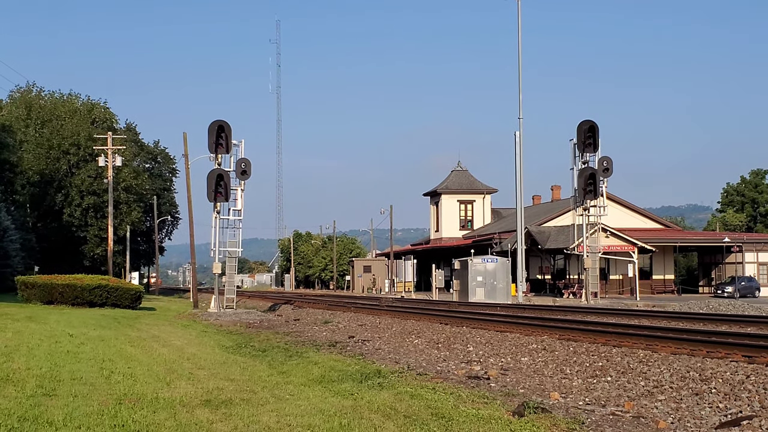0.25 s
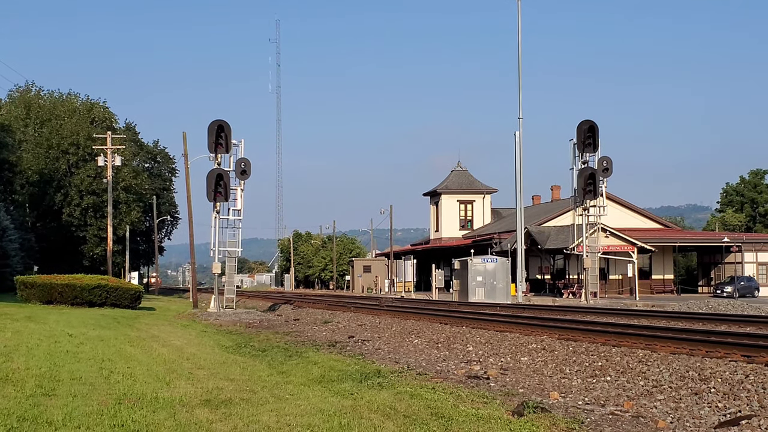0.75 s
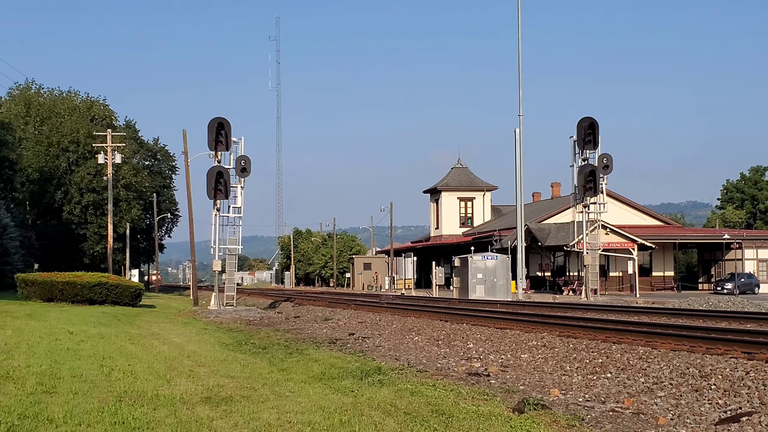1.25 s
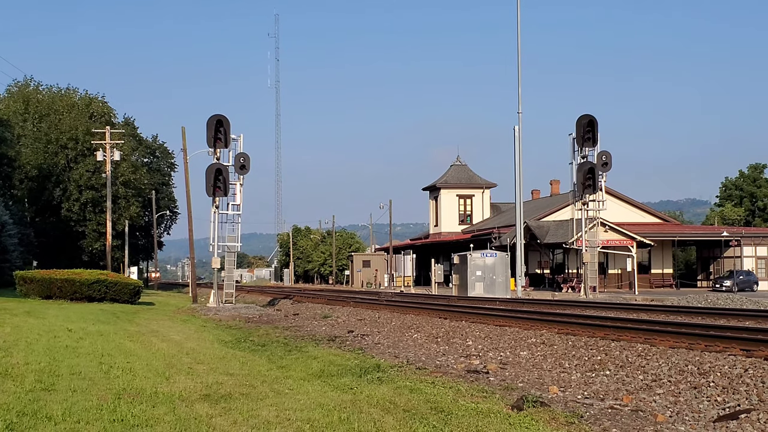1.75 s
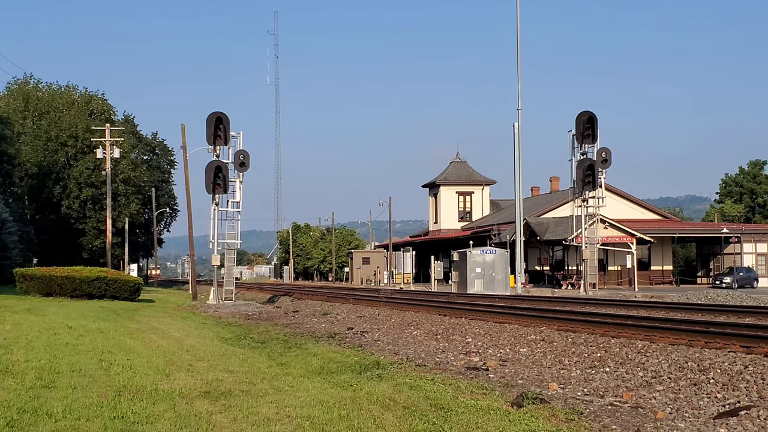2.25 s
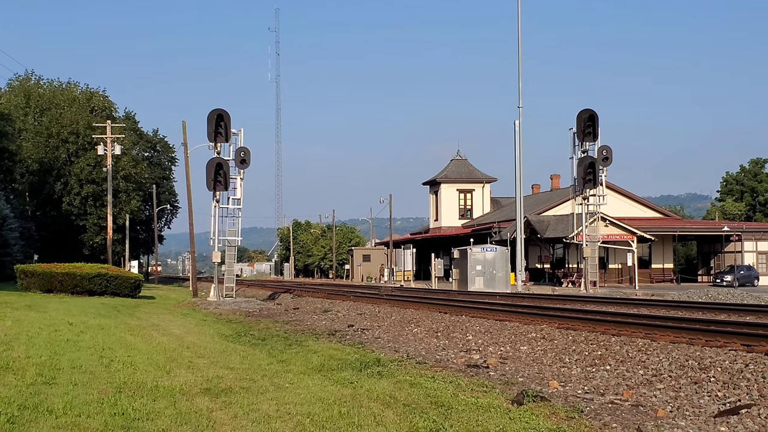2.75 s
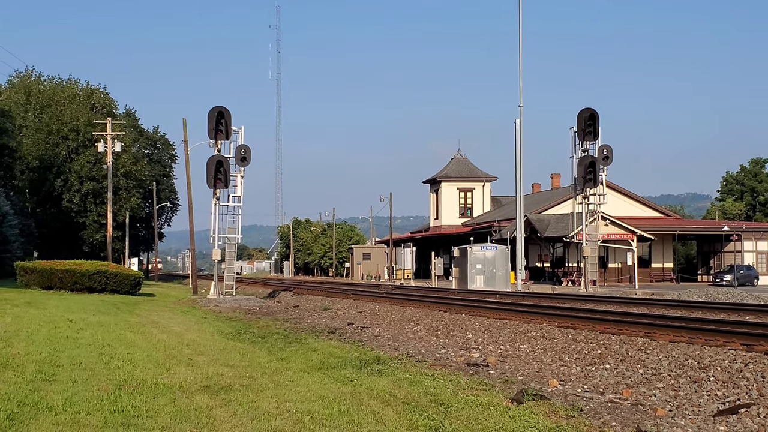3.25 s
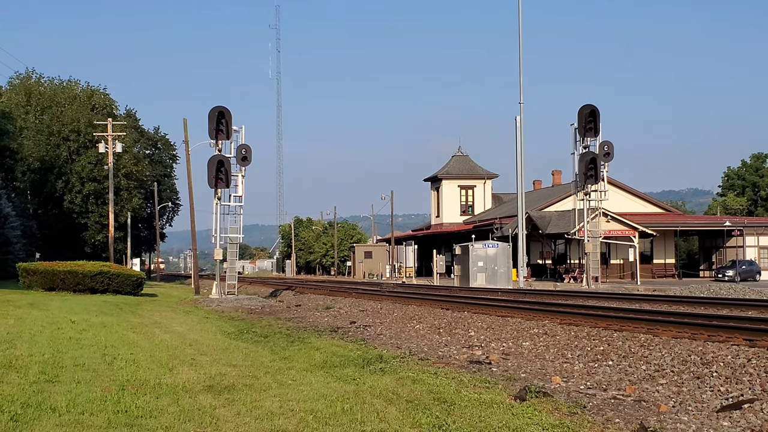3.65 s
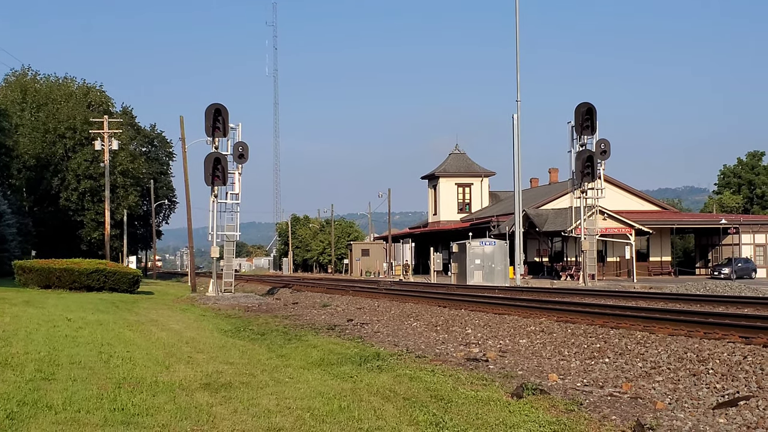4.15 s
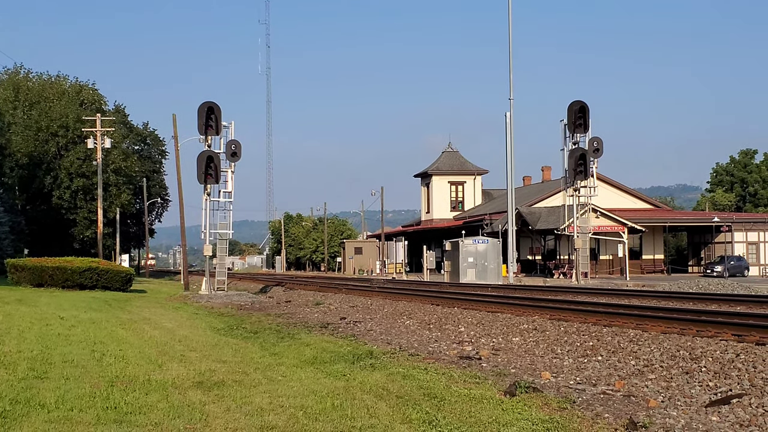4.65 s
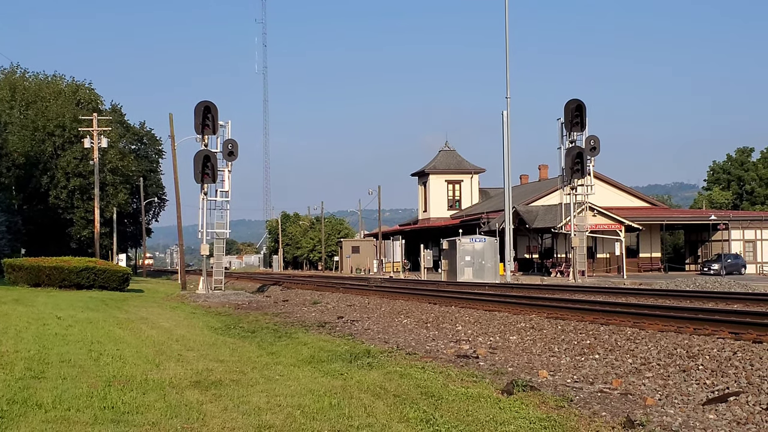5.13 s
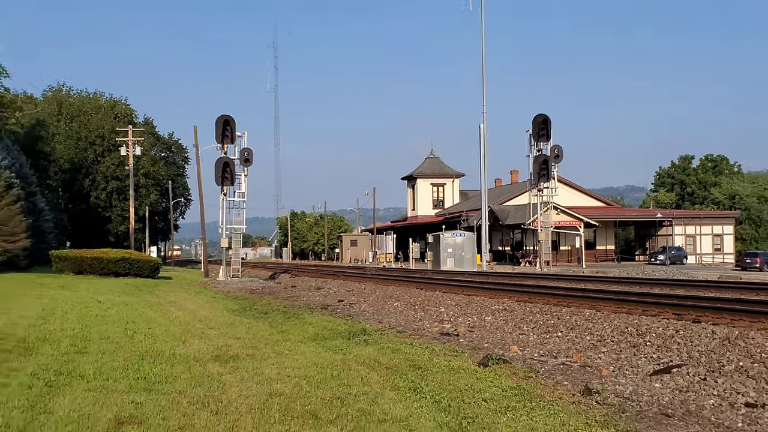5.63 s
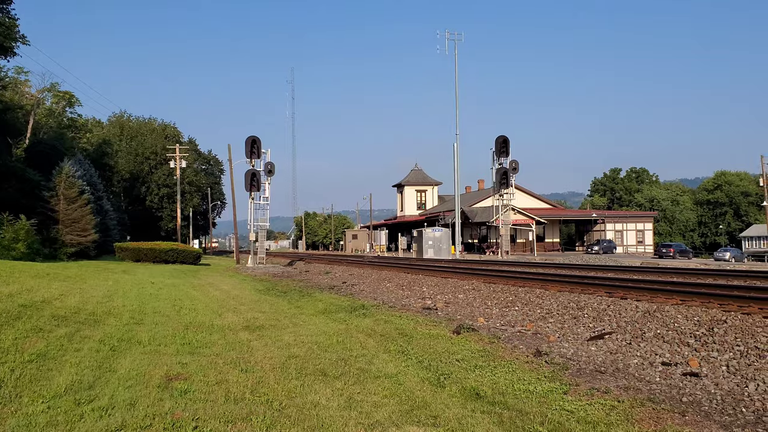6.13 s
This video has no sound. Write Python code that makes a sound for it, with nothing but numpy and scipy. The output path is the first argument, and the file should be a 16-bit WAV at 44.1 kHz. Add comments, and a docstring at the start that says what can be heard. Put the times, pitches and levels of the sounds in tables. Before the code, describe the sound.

A fast, high cricket trill swells over fainter crickets beside a quiet railway yard, with nasal catbird mews, small chirps and low distant engine rumble.

```python
"""Beside a railway yard on a summer morning: a fast near cricket trill over slower and fainter crickets.
A catbird mews twice as harmonic stacks roughened by noise; chirps and caws are gliding tones.
Shaped noise makes town rumble, traffic, insect chorus and hiss; narrow whines come and go.
A distant diesel, summed firing orders, gathers speed, then eases. Decaying modes tick in the camera body."""
import sys
import numpy as np
from scipy import signal
from scipy.fft import rfft, irfft, next_fast_len
from scipy.io import wavfile
from scipy.ndimage import uniform_filter1d, map_coordinates

SR = 44100
rng = np.random.default_rng(int(sys.argv[2]) if len(sys.argv) > 2 else 0)


def store_pcm(level_fs):
    """Save levels as 16-bit WAV."""
    pcm = np.round(np.clip(level_fs, -1, 1) * 32767).astype(np.int16)
    wavfile.write(sys.argv[1], SR, np.atleast_2d(pcm).T)


N = 281522


def amp(db):
    """Amplitude ratio from dB."""
    return 10 ** (np.asarray(db) / 20)


def unit(x):
    """Scale to rms 1."""
    return x / np.sqrt(np.mean(x ** 2) + 1e-20)


def along(points, hz):
    """Interpolate (f/Hz, value) points on a log frequency axis."""
    f, v = np.transpose(points)
    return np.interp(np.log(hz + 1), np.log(f + 1), v)


def curves(rows):
    """One value per sample for each column after the time."""
    s, *cols = np.transpose(rows)
    return [np.interp(np.arange(N) / SR, s, c) for c in cols]


def ramp(from_s, to_s):
    """0 before, 1 after, a straight line between."""
    return np.interp(np.arange(N) / SR, [from_s, to_s], [0, 1])


def wobble(knots_per_s):
    """Smooth random curve through normal random knots."""
    knots = rng.standard_normal(int(N * knots_per_s / SR) + 4)
    return map_coordinates(knots, [np.arange(N) * knots_per_s / SR])


def filtered(x, response):
    """Apply a response given as a function of frequency."""
    m = next_fast_len(N + SR // 2)
    return irfft(rfft(x, m) * response(np.fft.rfftfreq(m, 1 / SR)), m)[..., :N]


def sides(pan_db):
    """Left and right gains; pan_db is left over right."""
    return amp(np.array([pan_db / 2, -pan_db / 2]))


def add(out, s, sound):
    """Mix a stereo sound in at time s."""
    part = out[:, max(round(s * SR), 0):][:, :sound.shape[1]]
    part += sound[:, :part.shape[1]]


def rush(spectrum, patchy_db):
    """Stereo noise of rms 1: shaped spectrum, random gain patches, left-right likeness set by frequency."""
    # left-right correlation: f/Hz, correlation
    alike = [(60, 1), (150, 0.95), (380, 0.76), (950, 0.11), (2380, -0.1), (5980, -0.091), (15000, -0.33)]
    z = signal.stft(rng.standard_normal((2, N)), nperseg=512)[2]
    field = uniform_filter1d(rng.standard_normal(z.shape[1:]), 6, 0)
    field = uniform_filter1d(field, 14, 1)
    pair = signal.istft(z * amp(patchy_db * unit(field)), nperseg=512)[1][:, :N]
    closed = [(spectrum[0][0] * .8, -120), *spectrum, (spectrum[-1][0] * 1.1, -120)]

    def mid_side_response(hz):
        turn = np.arccos(np.clip(along(alike, hz), -1, .99)) / 2
        return amp(along(closed, hz)) * [np.cos(turn), np.sin(turn)]

    mid, side = filtered(pair, mid_side_response)
    return unit(np.array([mid + side, mid - side]))


def grass(x, wet_db, t60):
    """Short decaying scatter off stems and ballast, different at each port."""
    t = np.arange(SR // 8) / SR
    tail = rng.standard_normal((2, len(t))) * amp(-60 * t / t60)
    tail = tail / np.linalg.norm(tail[0])
    return x + amp(wet_db) * signal.fftconvolve(x, tail, axes=1)[:, :N]


def buildings(x):
    """Discrete wall echoes, channels swapped on every other one."""
    # delay/s, level/dB
    wall_echoes = [(.033, -5), (.062, -5), (.095, -7.5), (.128, -9.5), (.165, -14), (.205, -13), (.26, -19)]
    out = 0
    for k, (delay_s, db) in enumerate(wall_echoes):
        delayed = np.pad(x[::(-1) ** k], ((0, 0), (round(delay_s * SR), 0)))[:, :N]
        out = out + amp(db) * delayed
    return out


def yard(x, wet_db):
    """Wall echoes, smeared by trees."""
    return grass(x + amp(wet_db) * buildings(x), wet_db=-5, t60=.12)


def stroke(length, top_hz, sag_hz, lead_rad, octave_db, fall_hz=0):
    """One wing stroke: the file speeds up and slows, so the pitch arches; left leads right by lead_rad."""
    u = np.linspace(-1, 1, round(length * SR))
    hz = top_hz - sag_hz * u ** 2 - fall_hz * u
    phase = 2 * np.pi * np.cumsum(hz) / SR + rng.uniform(0, 2 * np.pi)
    phase = phase + [[lead_rad / 2], [-lead_rad / 2]]
    shape = (1 - u ** 8) * amp(-3 * u ** 2)
    return shape * amp(rng.normal(0, 1.0)) * (np.sin(phase) + amp(octave_db) * np.sin(2 * phase))


def glide(length, first_hz, middle_hz, last_hz, rasp):
    """A tone bending smoothly through three pitches; rasp shakes its size."""
    u = np.linspace(-1, 1, round(length * SR))
    hz = middle_hz + (last_hz - first_hz) / 2 * u + ((first_hz + last_hz) / 2 - middle_hz) * u ** 2
    shake = 1 + rasp * unit(uniform_filter1d(rng.standard_normal(len(u)), 160))
    fade = amp(-9 * np.clip(u, 0, 1) ** 2)  # breath runs out
    return (1 - u ** 4) * fade * shake * np.sin(2 * np.pi * np.cumsum(hz) / SR)


def town():
    """Rumble, drone and traffic wash: three bands of shaped noise with moving levels."""
    # t/s, level/dB
    rumble_level = [(0.0, -43.5), (0.5, -47), (0.8, -40), (0.85, -44.5), (1.87, -47), (1.92, -39),
                    (1.99, -49), (2.49, -45.5), (2.54, -57), (2.65, -44), (3.7, -47.5), (3.96, -45),
                    (5.85, -42.5), (5.95, -52.5), (6.18, -44), (6.38, -50.5)]
    # t/s, drone level/dB, traffic level/dB
    town_levels = [(0, -66.5, -60.5), (1.1, -61, -59.5), (1.6, -62.5, -59), (2.36, -63, -59),
                   (2.81, -64, -59.5), (3.94, -63, -59.5), (4.48, -64, -59.5), (5.35, -65, -57.5),
                   (5.8, -70.5, -61.5), (6.38, -73, -62.5)]
    # spectra: f/Hz, relative density/dB
    rumble_spectrum = [(12, -41), (20, -9.5), (48, -3), (64, 1.5), (83, -5), (97, -11.5), (130, -18.5),
                       (170, -53), (290, -120)]
    traffic_spectrum = [(110, -36), (190, -12), (232, -6), (327, -4), (493, -11), (724, -1.5), (848, -5.5),
                        (981, -11), (1850, -11), (2480, -17), (2680, -15.5), (3190, -22), (3320, -22.5),
                        (3590, -22), (4500, -19), (5850, -25), (9900, -120)]
    drone_spectrum = [(100, -12), (135, -5.0), (175, -13.5), (210, -16.5)]
    drone_db, traffic_db = curves(town_levels)
    rumble = amp(curves(rumble_level)[0]) * rush(rumble_spectrum, patchy_db=1.0)
    drone = amp(drone_db + 2.4 * wobble(4.2)) * rush(drone_spectrum, patchy_db=-2.0)
    traffic = amp(traffic_db) * rush(traffic_spectrum, patchy_db=1.1)
    return rumble + drone + traffic * sides(0.4)[:, None]


def air():
    """Noise bands: far insect chorus, one very high singer, fine hiss, a treble that swells at times."""
    # spectra: f/Hz, relative density/dB
    chorus_spectrum = [(4300, -44), (4800, 6), (5250, 5), (5800, -5.5), (6200, -1.5), (6900, 5.5),
                       (7700, 0), (8300, -6), (8800, -43)]
    hiss_spectrum = [(10000, -12.5), (11300, 2), (13000, 1), (14700, 8), (15600, 0.5)]
    # t/s, level/dB
    singer_level = [(0, -89), (.4, -78), (.9, -81), (1.24, -100), (3, -94), (4, -77), (6.38, -87)]
    treble_level = [(0, -87), (.6, -80.5), (1.3, -89), (3, -96), (5.7, -105), (6.13, -79), (6.38, -88)]
    chorus = amp(-68.0 + wobble(0.85)) * rush(chorus_spectrum, patchy_db=1.5)
    high = amp(curves(singer_level)[0]) * rush([(12400, -25), (12900, 7), (13400, -10)], patchy_db=7.0)
    swell = amp(curves(treble_level)[0]) * rush([(9400, -7.5), (10500, 0.0), (11700, -7)], patchy_db=6.5)
    hiss = amp(-79.5 + 0.71 * wobble(3.0)) * rush(hiss_spectrum, patchy_db=4.0)
    return chorus * sides(3.2)[:, None] + (high + swell + hiss) * sides(1.9)[:, None]


def engine():
    """Low orders of the diesel's firing cycle plus the 15th, each wandering in level and phase."""
    # t/s, firing cycle rate/Hz, 10th order level/dB, 15th order level/dB
    engine_run = [(0, 7.9, -58, -80), (1, 10.9, -70.5, -78), (1.8, 10.9, -66, -72), (2.6, 11.2, -57, -61),
                  (3.5, 11.8, -54, -68), (4.1, 12.15, -56, -78), (5.05, 11.9, -55, -85),
                  (5.2, 10, -70, -89), (6.38, 10.5, -66, -89)]
    # order, level above the 10th/dB
    low_orders = [(6, -1), (7, -1), (8, 0), (9, 0), (10, 0), (11, -15), (12, -17)]
    cycle_hz, tenth_db, top_db = curves(engine_run)
    turn = 2 * np.pi * np.cumsum(cycle_hz) / SR
    low = 0
    for k, db in low_orders:
        low = low + amp(tenth_db + db + 2 * wobble(2.5)) * np.sin(k * turn + .5 * wobble(3))
    top = amp(top_db + wobble(2)) * np.sin(15 * turn + .4 * wobble(3))
    return np.sqrt(2) * (low + top)  # levels are rms


def whines():
    """Narrow noise mixed with phase-jittered tones: low and high whines peak, high and thin ones waver."""
    # low, high, thin: f/Hz, width/Hz, left-right/dB
    whine_tones = [(1114, 68, -6.5), (2642, 24, -7.5), (3390, 45, -4)]
    # power share of the jittered tone, the rest narrow noise: low, high, thin
    tone_shares = (.1, .8, .3)
    # base levels: t/s, level/dB
    low_base = [(0, -89), (1.8, -89), (2.4, -73), (5.7, -75.5), (6.38, -72.5)]
    high_base = [(0, -92), (.3, -76), (.8, -95), (1, -97), (1.2, -78.5), (2.35, -81), (2.5, -95),
                 (2.8, -80.5), (3.3, -80), (3.45, -91), (3.6, -77.5), (4.7, -83), (4.85, -84), (5.1, -90),
                 (5.4, -82), (5.6, -80), (6, -93), (6.1, -80), (6.3, -80), (6.34, -88)]
    thin_base = [(0, -90), (1.1, -83), (2.4, -83), (2.6, -97), (6.38, -99)]
    # peaks: t/s, level/dB
    low_peaks = [(2.72, -63.5), (3.94, -60), (4.25, -62.5), (4.54, -66), (5.1, -68), (5.6, -62),
                 (6.08, -68.5)]
    high_peaks = [(.44, -73), (1.18, -73), (1.72, -74.5), (2, -75.5), (2.16, -87), (4.54, -71),
                  (5.2, -74.5), (5.31, -71.5), (6.19, -70), (6.27, -73)]
    swell_db_per_s, waver_db = 68, 3.5
    out, t = 0, np.arange(N) / SR

    def with_peaks(base_db, swells):
        slopes = [db - swell_db_per_s * abs(t - s) for s, db in swells]
        return np.max([base_db] + slopes, axis=0)

    low_db = with_peaks(curves(low_base)[0], low_peaks)
    high_db = with_peaks(curves(high_base)[0] + waver_db * wobble(14), high_peaks)
    thin_db = curves(thin_base)[0] + waver_db * wobble(9.5)
    for db, (hz, width_hz, pan_db), share in zip((low_db, high_db, thin_db), whine_tones, tone_shares):
        resonance = lambda f: 1 / (1 + ((f - hz) / (width_hz / 2)) ** 2)
        fuzz = unit(filtered(rng.standard_normal(N), resonance))
        tone = unit(np.sin(2 * np.pi * hz * t + wobble(width_hz)))
        whine = np.sqrt(share) * tone + np.sqrt(1 - share) * fuzz
        out = out + amp(db + 0.57 * wobble(7.9)) * whine * sides(pan_db)[:, None]
    return out


def ticks():
    """Modes of the camera's plastic shell ring briefly; the far (right) port hears them late and dull."""
    # t/s, level/dB, treble/dB, left-right/dB
    tick_events = [(1.104, -45, 16, 6), (2.6412, -13.5, -13.5, 31), (2.835, -53, 25.5, 16),
                   (4.875, -42, -20, 12), (5.321, -33, -22, 17), (6.077, -35.5, -18, 21)]
    # shell modes: f/Hz, level/dB, t60/s
    shell_modes = [(1020, -13.5, 0.0088), (2070, 3, 0.0042), (2593, -3.5, 0.0069), (6520, -1, 0.0023),
                   (9350, -17, 0.003)]
    out, t = np.zeros((2, N)), np.arange(SR // 40) / SR
    soft = np.exp(-(t / .0003) ** 2) - 1  # the contact takes a moment
    for s, db, treble_db, pan_db in tick_events:
        ring = []
        for hz, level_db, t60 in shell_modes:
            decay = amp(level_db - 60 * t / t60 + treble_db * (hz > 5000))
            ring.append(soft * decay * np.sin(2 * np.pi * hz * t))
        late = np.pad(sum(ring[:2]), (30, 0))[:len(t)]  # two lowest modes, 30 samples late
        add(out, s, amp(db) * np.array([sum(ring), amp(-pan_db) * late]))
    return out


def far_crickets():
    """Two trills of strokes falling in pitch, half drowned in scatter."""
    # stroke rate/Hz, first stroke/s
    far_beats = [(28.02, .032), (14.02, .004)]
    # middle f/Hz, fall in half a stroke/Hz, level/dB
    far_songs = [(5300, 277, -70.5), (6050, 250, -71)]
    out = 0
    for (rate_hz, first_s), (hz, fall_hz, db) in zip(far_beats, far_songs):
        song = np.zeros((2, N))
        for centre_s in np.arange(first_s, N / SR, 1 / rate_hz):
            sound = stroke(.018, rng.normal(hz, 60), 150, -1.5, octave_db=-40, fall_hz=fall_hz)
            add(song, centre_s - .009 + rng.normal(0, .0008), sound)
        out = out + amp(db + 2 * wobble(2)) * song
    return grass(out * sides(2)[:, None], wet_db=-2, t60=.11)


def slow_cricket():
    """Bouts of separate wing strokes, higher than the near cricket and to the left."""
    # first stroke/s, last stroke/s, strokes, first level/dB, last level/dB
    bouts = [(0.125, 0.425, 7, -79, -70), (1, 1.222, 5, -79, -64), (2.013, 2.463, 9, -75, -74),
             (2.964, 3.395, 9, -67, -61.5), (3.816, 4.406, 12, -71, -63), (4.466, 5.063, 12, -61, -63),
             (5.39, 5.457, 2, -70, -65), (5.988, 6.36, 8, -80, -69)]
    out = np.zeros((2, N))
    for first_s, last_s, number, first_db, last_db in bouts:
        for share in np.linspace(0, 1, round(number)):
            sound = stroke(0.02, rng.normal(7800, 33), 500, 1.66, octave_db=-37)
            db = first_db + share * (last_db - first_db)
            add(out, first_s + share * (last_s - first_s) - .0085, amp(db) * sound)
    return grass(out * sides(7)[:, None], wet_db=-6, t60=.06)


def crows():
    """Far caws: only the strongest overtone carries, a rough tone whose pitch arches."""
    # start/s, length/s, level/dB
    caws = [(1.235, .115, -64.5), (1.662, .1, -67.5), (2.105, .108, -67), (5.289, .058, -67),
            (5.706, .058, -64), (6.108, .135, -68)]
    top_hz, rise_hz_per_s, sag_hz_per_s = 1610, 3800, 4800
    out = np.zeros((2, N))
    for s, length, db in caws:
        first_hz = top_hz - rise_hz_per_s * length / 2
        last_hz = top_hz - sag_hz_per_s * length / 2
        caw = glide(length, first_hz, top_hz, last_hz, rasp=.8)
        add(out, s, amp(db) * np.ones((2, 1)) * caw)
    return yard(out, wet_db=-8)


def small_birds():
    """Whistled chirps, nearly all falling in pitch, each with its own send to the wall echoes."""
    # start/s, length/s, f/Hz, fall/Hz, level/dB, left-right/dB, echo send/dB
    notes = [(1.848, 0.064, 4163, 58, -54, -3, -1.5), (2.956, 0.052, 3565, 42, -66.5, -3, -6),
             (3.196, 0.052, 4060, 30, -61, -3, 5.5), (3.228, 0.047, 3860, 70, -61.5, -6, 1),
             (4.277, 0.02, 2970, 111, -66, -2.5, -8), (4.295, 0.018, 2550, 85, -66, -10, -14),
             (4.369, 0.04, 3390, 120, -66, -10, 0), (4.396, 0.024, 3150, 60, -67, -11, 0),
             (4.515, 0.042, 3660, 107, -63, 5, -15), (4.565, 0.051, 3660, 28, -66, 2, -12),
             (4.567, 0.026, 3570, 30, -63, 1, -12), (4.606, 0.042, 2930, 100, -68.5, -15, 4),
             (4.72, 0.041, 4150, 12, -57, 0, 7.5), (4.744, 0.042, 3970, 116, -59, 3, 0),
             (4.803, 0.029, 3400, 120, -59, -1, -1), (4.82, 0.023, 3170, 38, -63, -1, -12),
             (4.897, 0.011, 3270, -2, -62, 3, -16), (4.979, 0.024, 2940, 23, -67, -8, -2),
             (5.244, 0.044, 3320, 64, -66, -7, 2), (5.298, 0.018, 4080, 220, -65, 0, -14),
             (5.497, 0.047, 3497, 30, -61, 3, -18), (5.499, 0.051, 3400, 20, -63, 1, -15),
             (5.551, 0.055, 3460, 20, -67, -1, -18), (5.551, .04, 3370, 20, -63.5, 1, -14),
             (5.563, .02, 3800, 40, -71, 5, -17), (5.56, 0.018, 4000, 120, -68, 15, -17)]
    fall_by_middle = 0.26  # share of the fall reached halfway
    chirps, to_walls = np.zeros((2, 2, N))
    for s, length, hz, fall_hz, db, pan_db, echo_db in notes:
        whistle = glide(length, hz, hz - fall_by_middle * fall_hz, hz - fall_hz, rasp=.2)
        note = amp(db) * sides(pan_db)[:, None] * whistle
        add(chirps, s, note)
        add(to_walls, s, amp(echo_db) * note)
    direct = grass(chirps, wet_db=-7, t60=.1)
    return direct + grass(amp(-8.5) * buildings(to_walls), wet_db=5, t60=.18)


def catbird():
    """Nasal harmonic stacks; uneven alternate cycles add lines halfway, rasp blurs them."""
    # two mews: t/s, f/Hz, level before tone shaping/dB, halfway lines/dB, rasp (relative noise size)
    mews = [
        [(.4, 1310, -72, -9, 3.5), (.465, 1338, -67.5, -9, 2.8), (.515, 1436, -64, -10, 1.7),
         (.575, 1390, -63.5, -4, 1.6), (.605, 1446, -62, -5, 2), (.63, 1490, -66, -14, 2.3),
         (.68, 1500, -65.5, -11, 1.8), (.72, 1425, -63, -2, 1.2), (.755, 1420, -65.5, -4, 1.8),
         (.8, 1341, -68, -13, 2.4), (.88, 1262, -70.5, -13, 2.6), (.9, 1250, -77, -12, 3),
         (.918, 1320, -67.5, -6, 3.5), (.95, 1200, -72, -6, 4), (.985, 1190, -77, -6, 4)],
        [(3.76, 1330, -76, -12, 3), (3.83, 1390, -70, -12, 2.6), (3.87, 1445, -65.5, -12, 1.6),
         (3.97, 1450, -66, -12, 1.7), (4.01, 1405, -64, -12, 1.3), (4.11, 1383, -65.5, -12, 1.5),
         (4.16, 1350, -70, -12, 2.6), (4.25, 1334, -76, -12, 3)],
    ]
    # per mew: open beak resonance f/Hz, brightness/(dB/octave), flutter depth, lowest lines/dB
    mew_voices = [(4270, -4.5, .45, 0), (5630, 1.5, 1, -8)]
    # throat response: f/Hz, gain/dB
    throat = [(600, -28), (1400, -20), (2100, -4), (2900, -6), (3500, -5.5), (4200, 0), (5700, -9.5),
              (7500, -6.5), (10000, -24), (12000, -54), (15000, -13)]
    flutter_hz = 340  # a second membrane splits each line into strands
    shake_per_rasp = .005  # relative pitch shake
    out, t = np.zeros(N), np.arange(N) / SR
    for rows, (beak_hz, bright_db, flutter, low_db) in zip(mews, mew_voices):
        hz, db, half_db, rasp = curves(rows)
        phase = 2 * np.pi * np.cumsum(hz * (1 + shake_per_rasp * rasp * wobble(220))) / SR
        uneven = amp(half_db + 1.5 * wobble(12))
        voice = 0
        for k in range(2, 17):  # in half harmonics
            beak_db = 7 * np.exp(-((k * hz / 2 - beak_hz) / 600) ** 2)
            tilt_db = bright_db * np.log2(k / 6) + low_db * (k < 5)
            line = np.cos(k * phase / 2) * amp(tilt_db + beak_db + 2.6 * wobble(35))
            voice = voice + line * (uneven if k % 2 else 1)
        flutter_phase = 2 * np.pi * np.cumsum(flutter_hz * (1 + .08 * wobble(15))) / SR
        voice = voice * (1 + flutter * amp(1.8 * wobble(10)) * np.cos(flutter_phase))
        voice = voice + rasp * amp(2.8 * wobble(45)) * rng.standard_normal(N)
        gate = np.clip(np.minimum(t - rows[0][0], rows[-1][0] - t) / .04, 0, 1)
        out += gate * amp(db) * voice
    voiced = filtered(out, lambda f: amp(along(throat, f)))
    return yard(voiced * sides(2.4)[:, None], wet_db=-12)


def near_cricket():
    """A fast even trill of wing strokes that swells in, warms up in pitch and sometimes falters."""
    # t/s, level/dB, left-right/dB
    trill = [(.55, -74, -7), (1.15, -62.5, -1), (1.45, -55.5, -3), (2.6, -54, -3), (3, -53.5, 2),
             (3.3, -56, -3.5), (3.7, -56, 0), (3.9, -51.5, 4), (4.4, -53, 0), (5.3, -52.5, 0),
             (5.5, -54, 3), (5.85, -58.5, 0), (6.38, -59.5, 1)]
    # wings miss the file: middle/s, length/s
    falters = [(2.753, .012), (4.102, 0.013), (4.415, 0.035)]
    rate_hz, rate_gain_hz_per_s, beat_s = 43.0, .056, 2.2942  # rate holds at beat_s, when one stroke falls
    from_s, cold_hz, warm_hz = .57, 6680, 7098
    out, t = np.zeros((2, N)), np.arange(N) / SR
    stroke_count = rate_hz * (t - beat_s) + rate_gain_hz_per_s / 2 * (t - beat_s) ** 2
    whole_strokes = np.arange(np.ceil(stroke_count[round(from_s * SR)]), stroke_count[-1])
    db, pan_db = curves(trill)
    top_hz = cold_hz + (warm_hz - cold_hz) * ramp(0.74, 1.62)
    lead_rad = 0.86 * ramp(3.4, 4.2)  # comes to reach the left port first
    for centre_s in np.interp(whole_strokes, stroke_count, t):
        i = min(round(centre_s * SR), N - 1)
        stroke_hz = top_hz[i] + rng.normal(0, 20)
        sound = stroke(.0142, stroke_hz, 620, lead_rad[i], octave_db=-33, fall_hz=90)
        add(out, centre_s - .007 + rng.normal(0, .0003), sound)
    for middle_s, length in falters:
        out *= np.clip((abs(t - middle_s) - length / 2) / 0.0018, 0, 1)
    return grass(out * amp(db) * sides(pan_db), wet_db=-11, t60=.05)


def scene():
    """All layers, background to near cricket."""
    background = town() + air() + engine() + whines() + ticks()
    birds = crows() + small_birds() + catbird()
    return background + far_crickets() + slow_cricket() + birds + near_cricket()


def record(dry):
    """The camera keeps nothing at or above its band limit, 15550 Hz."""
    return filtered(dry, lambda hz: hz < 15550)


dry = scene()
out = record(dry)
store_pcm(out)
```